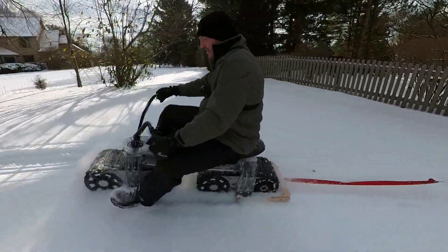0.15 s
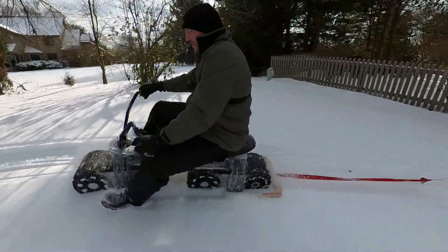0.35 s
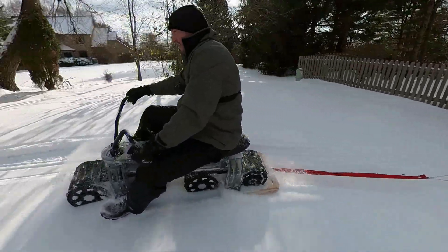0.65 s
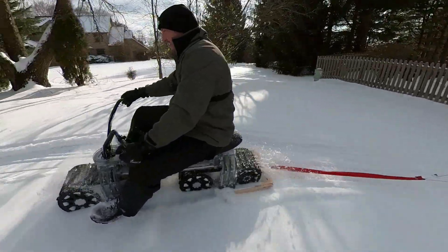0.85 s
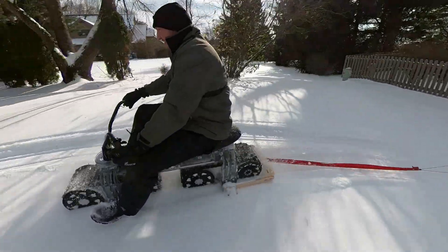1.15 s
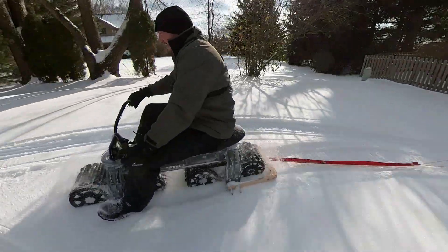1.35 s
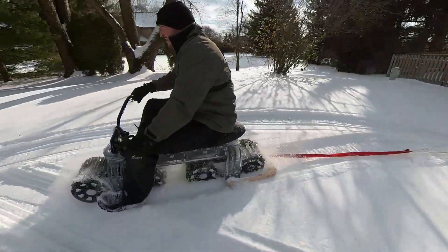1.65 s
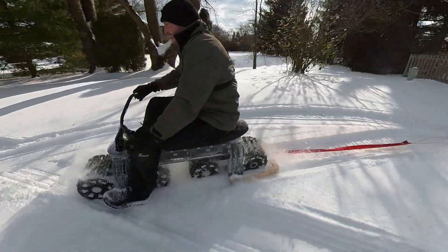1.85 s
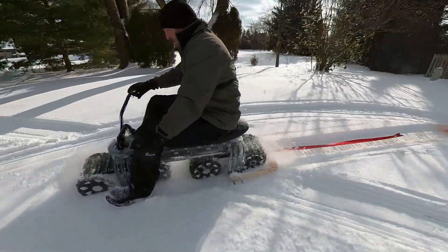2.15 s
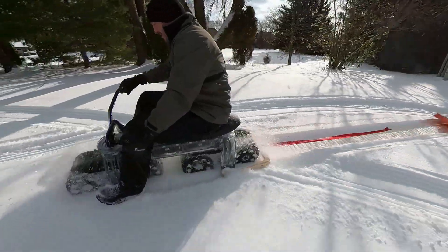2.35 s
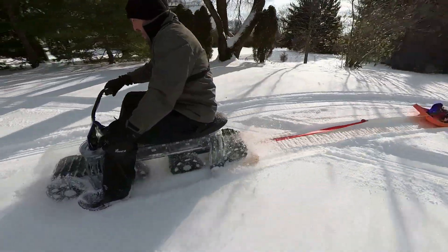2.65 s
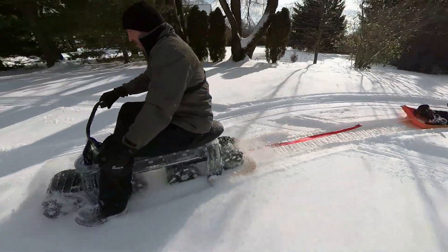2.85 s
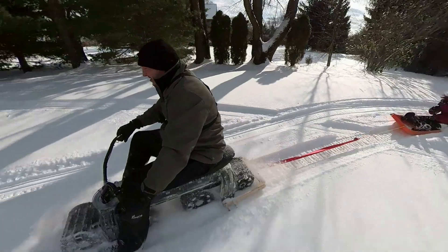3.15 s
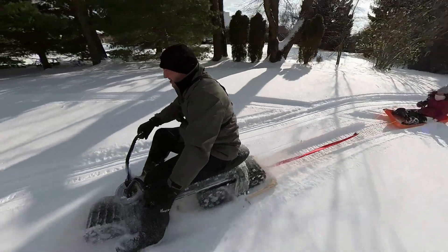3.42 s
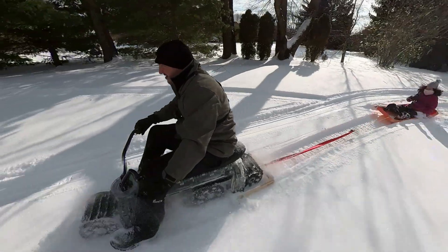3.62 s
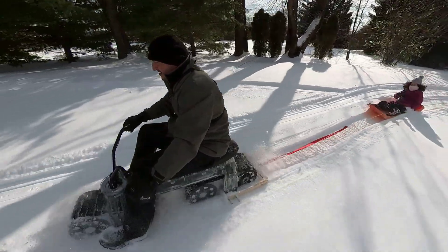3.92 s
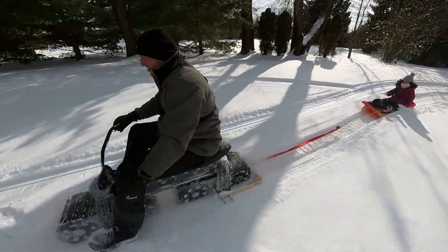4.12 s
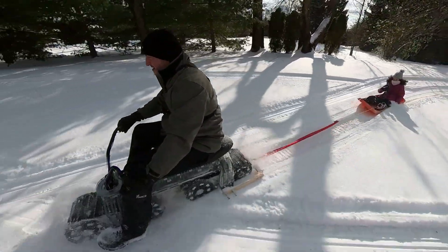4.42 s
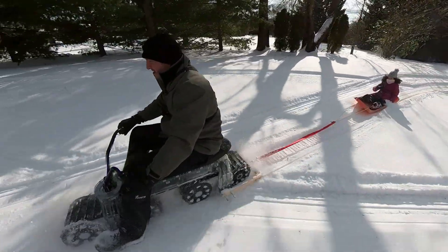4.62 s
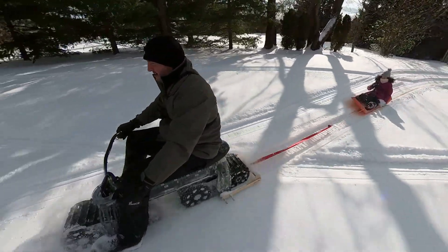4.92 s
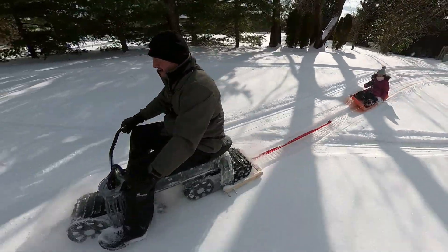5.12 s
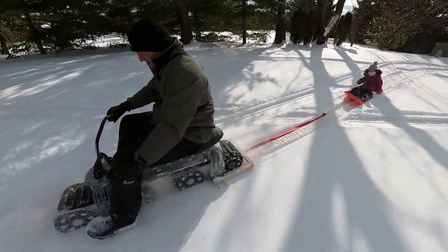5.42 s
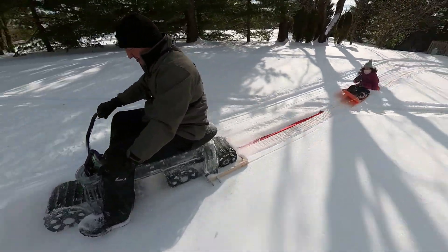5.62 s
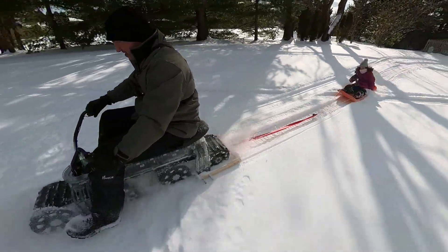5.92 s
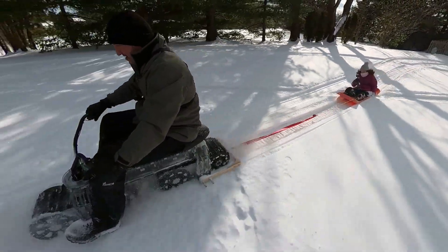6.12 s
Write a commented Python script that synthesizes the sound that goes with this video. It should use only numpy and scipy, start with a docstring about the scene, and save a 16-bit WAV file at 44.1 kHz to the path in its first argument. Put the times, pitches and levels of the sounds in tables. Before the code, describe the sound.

A rapid stuttering putter of track lugs on packed snow, close and dry, with low rumble and grainy crushing noise. It dips in pace at first, then speeds up and eases at the very end. Sprays of powder hiss early, clicks and small clusters of clatter scatter throughout, a few hard knocks jump out, and deep wind puffs buffet the stereo microphone riding alongside in the open air.

```python
"""Tracked vehicle in snow

A small electric vehicle churns along on two rubber tracks, close to a microphone that travels with it.
Lugs thump as pressure swings, about 23 to 30 a second on the near track, and tick as ringing modes.
Shaped noise makes the rumble, churn and hiss beneath, the short sprays of thrown snow and fine mist,
and the wind that buffets the two microphone ports. Hard lumps knock on the frame: rings with noise."""
import sys
import numpy as np
from scipy import signal
from scipy.fft import rfft, irfft, next_fast_len
from scipy.io import wavfile
from scipy.ndimage import uniform_filter1d, map_coordinates

SR = 44100
rng = np.random.default_rng(int(sys.argv[2]) if len(sys.argv) > 2 else 0)


def dump_mix(stems):
    """Bounce the given channels to the path in sys.argv[1] as a 16-bit WAV at rate SR."""
    frames = np.atleast_2d(stems).T  # one column per channel
    limited = np.clip(frames, -1, 1)  # hard clip at full scale
    pcm = np.round(limited * 32767).astype(np.int16)
    wavfile.write(sys.argv[1], SR, pcm)


N = 276507


def amp(db):
    """Decibels as gain."""
    return 10 ** (np.asarray(db) / 20)


def unit(x):
    """x at rms 1."""
    return x / np.sqrt(np.mean(x ** 2) + 1e-20)


def along(points, hz):
    """Read a curve of (Hz, value) points on a log frequency axis."""
    f, v = np.transpose(points)
    return np.interp(np.log(hz + 1), np.log(f + 1), v)


def curves(rows):
    """One automation curve, a value per sample, for each column after the time."""
    s, *cols = np.transpose(rows)
    return [np.interp(np.arange(N) / SR, s, c) for c in cols]


def at(curve, times):
    """Values of a per-sample curve at the given times in seconds."""
    return curve[np.clip(times * SR, 0, N - 1).astype(int)]


def wobble(rate):
    """A smooth random curve, rate knots a second."""
    knots = rng.standard_normal(int(N * rate / SR) + 4)
    return map_coordinates(knots, [np.arange(N) * rate / SR])


def filtered(x, response):
    """x times a response of frequency."""
    m = next_fast_len(N + SR // 2)
    return irfft(rfft(x, m) * response(np.fft.rfftfreq(m, 1 / SR)), m)[..., :N]


# Stereo width of the noises. Each row: frequency in Hz, left-right correlation from 0 to 1.
LIKENESS = [(35, .99), (85, .997), (170, .994), (350, .995), (550, .96), (800, .84), (1300, .62),
            (2400, .74), (4400, .84), (9000, .83), (13000, .84)]


def rush(spectrum, alike=LIKENESS):
    """Stereo noise of rms 1: mid and side are mixed to the wanted correlation at each frequency."""
    def colour(hz):
        turn = np.arccos(np.clip(along(alike, hz), -1, 1)) / 2
        return amp(along(spectrum, hz)) * [np.cos(turn), np.sin(turn)]

    mid, side = filtered(rng.standard_normal((2, N)), colour)
    return unit(np.array([mid + side, mid - side]))


def laid(times, shapes):
    """One row of samples added at each time."""
    index = np.round(np.asarray(times) * SR).astype(int)[:, None] + np.arange(shapes.shape[1])
    return np.bincount(np.clip(index, 0, N).ravel(), shapes.ravel(), N + 1)[:N]


def struck(db, modes, rise, detune_db, spread_db):
    """Decaying sine modes (Hz, dB, t60 s), with new strengths and pitches for every contact."""
    t = np.arange(SR // 30) / SR
    chance = rng.standard_normal((len(db), 2 * len(modes)))
    rings = 0
    for k, (hz, level, t60) in enumerate(modes):
        decay = amp(level + spread_db * chance[:, [2 * k]] - 60 * t / t60)
        pitch = hz * amp(detune_db * chance[:, [2 * k + 1]])
        rings = rings + decay * np.sin(2 * np.pi * pitch * t)
    return amp(db)[:, None] * (1 - np.exp(-t / rise)) * rings


def swell(times, db, rise, t60):
    """An envelope that leaps at each time and dies away."""
    t = np.arange(SR // 20) / SR
    return laid(times, amp(db[:, None] - 60 * t / t60) * (1 - np.exp(-t / rise)) ** 2)


def patchy(x, patchy_db, size):
    """x at rms 1 with random patches of gain, size = (bands, frames)."""
    z = signal.stft(x, nperseg=256)[2]
    field = rng.standard_normal(z.shape[1:])
    for axis in (0, 1):
        field = uniform_filter1d(field, size=size[axis], axis=axis)
    return unit(signal.istft(z * amp(patchy_db * unit(field)), nperseg=256)[1][:, :N])


CREST_SHARE = .66  # scales the crest of a blow relative to its dip


def thump(db, width, rebound):
    """A lug slaps packed snow: one swing of pressure, a dip and then a crest, and a small later rebound."""
    widths = width * amp(rng.normal(0, 0.58, (len(db), 1)))
    u = (np.arange(SR // 50) / SR - 1 / 100) / widths  # time from mid-swing, in widths
    swing = np.where(u > 0, CREST_SHARE, 1) * u * np.exp(.5 - u * u / 2)
    return amp(db)[:, None] * (swing + rebound * np.exp(-(u - 4.2) ** 2 / 2))


# Pace of the near track. Each row: time in seconds, lugs a second.
LUG_RATE = [(0.0, 25.0), (0.4, 23.57), (0.8, 23.26), (1.2, 23.9), (1.6, 25.62), (2.0, 25.74), (2.4, 26.45),
            (2.9, 27.23), (3.4, 28.08), (3.9, 27.8), (4.2, 27.95), (4.5, 29.11), (4.8, 28.95), (5.2, 29.07),
            (5.6, 29.51), (6.0, 29.43), (6.27, 26.63)]
# The vehicle rocks, so lugs land a little early or late. Each row: time in seconds, lead in lug pitches.
ROCKING = [(2.0, -.03), (2.3, .02), (2.72, .03), (2.88, -.07), (3.02, .04), (3.4, .03), (3.56, -.06),
           (3.7, 0), (3.85, -.08), (4.05, .03), (4.4, 0)]
FIRST_LUG = .40  # share of a lug pitch still to roll at the start
SCATTER_S = .000957  # random timing of each lug


def lug_times(lead):
    """The moments when the lugs of one track come down, and two random draws for each lug."""
    turns = np.cumsum(curves(LUG_RATE)[0]) / SR - FIRST_LUG + lead + curves(ROCKING)[0]
    times = np.flatnonzero(np.diff(np.floor(turns)) > 0) / SR
    chance = rng.standard_normal((len(times), 3))
    return times + SCATTER_S * chance[:, 0], chance[:, 1], chance[:, 2]


# Mix of the drive. Each row: time in seconds, levels in dB of rumble, churn, hiss, near blows,
# far blows and soft ticks.
DRIVE_MIX = [(0, -22, -38, -47, -12, -15, -32.5), (.7, -21.5, -35.5, -45.5, -8.5, -25, -39.5),
             (1.4, -22.5, -37.5, -47, -6.5, -30, -33.5), (1.6, -22.5, -40, -49.5, -9.5, -19, -28),
             (2, -19.5, -38.5, -48.5, -11, -21, -34.5), (2.4, -22.5, -41, -50.5, -7, -21, -29),
             (3.2, -22.5, -38, -46.5, -8.5, -14.5, -30.5), (4.1, -23, -39.5, -48, -6, -10, -32),
             (4.7, -23, -38.5, -47.5, -8.5, -15, -43), (5.4, -20.5, -38, -47.5, -21, -7, -36.5),
             (6.27, -22.5, -38, -47.5, -6.5, -18.5, -35.5)]
# The far track slips ahead in the turn. Each row: time in seconds, lead in lug pitches.
FAR_LEAD = [(0, -.3), (.3, -.05), (.6, .15), (.9, .5), (1.5, .75), (2.2, 1), (3.6, 1), (3.95, 1.25),
            (4.45, 1.5), (4.9, 1.6), (5.05, 1.75), (5.4, 1.95), (6.27, 2.05)]
# Sharp ticks on the sprockets, strong and faint, at set moments.
# Each row: time in seconds, level in dB before the modes.
SHARP_TICKS = [(0.025, -24.5), (0.055, -32), (0.0618, -24.5), (0.469, -36), (0.6395, -24), (0.6853, -26.5),
               (0.7133, -29), (0.9114, -27), (1.023, -31), (1.11, -31), (1.193, -32), (1.261, -39),
               (1.301, -32), (1.591, -27.5), (1.8223, -30), (2.368, -28), (2.405, -28), (2.419, -28),
               (2.442, -29), (2.8598, -25), (2.8966, -24.5), (2.9305, -26), (2.951, -33), (2.967, -27),
               (3.1445, -31), (3.185, -34), (3.218, -32), (3.4298, -26), (3.467, -30), (3.714, -31),
               (3.8302, -29), (3.864, -33), (3.925, -27.5), (3.9952, -23), (4.052, -27), (4.0664, -29),
               (4.0771, -30), (4.114, -32), (4.1483, -33), (4.206, -31), (4.296, -30.5), (4.331, -33),
               (4.414, -26), (4.448, -30), (4.637, -33), (4.663, -40), (4.671, -30), (4.777, -44),
               (5.0276, -26), (5.0606, -29), (5.0929, -30.5), (5.156, -37), (5.2257, -33.5), (5.2968, -28),
               (5.532, -31), (5.565, -30), (5.6, -26.5), (5.666, -33), (5.739, -42), (5.772, -27),
               (5.8032, -31), (5.8375, -25.5), (6.111, -26)]
# Modes that ring on after each blow. Each row: frequency in Hz, level in dB, t60 in seconds.
DECK_MODES = [(230, -14, 0.043), (369, -12.5, 0.032), (475, -14, 0.022), (590, -18.5, 0.019)]
# Modes of a tick. Each row: frequency in Hz, level in dB, t60 in seconds.
SPROCKET_MODES = [(600, -1, 0.017), (900, 3, 0.014), (1200, 3, 0.009), (2700, -3, 0.006), (3500, -7, 0.006),
                  (4840, -15, 0.006)]
# The sprocket's clearest ring dips, then climbs as the tracks turn toward the microphone.
# Each row: time in seconds, frequency in Hz.
CLATTER_PITCH = [(0, 2020), (1.5, 1580), (2.6, 1635), (3.1, 1959), (4.2, 2200), (6.27, 2240)]
# Tone of the rumble. Each row: frequency in Hz, relative level in dB per Hz.
RUMBLE_TONE = [(35, -29), (60, 4), (130, 5.5), (350, -1), (540, -12), (800, -25.5), (1700, -120)]
# Tone of the churned snow. Each row: frequency in Hz, relative level in dB per Hz.
CHURN_TONE = [(290, -29.5), (500, -3), (650, -1.5), (744, -4.5), (946, -4), (1130, -10), (1600, -13.5),
              (3000, -27), (3900, -55), (6600, -120)]
# Tone of the steady snow hiss. Each row: frequency in Hz, relative level in dB per Hz.
HISS_TONE = [(1300, -4.5), (2200, -3), (2700, -0.5), (3600, 1.5), (5500, -4), (7400, -9), (9200, -15),
             (11000, -19), (12300, -17.5), (14000, -30), (15700, -49)]
TICK_AHEAD_S = .0038  # a lug meets the sprocket just before it slaps the snow
SAME_LUG_S = .011  # a sharp tick belongs to the lug this near and sets its moment
SHARP_BLOW_DB = -0.5  # such a lug thumps slightly softer
BLOW_SPREAD_DB, FAR_TICK_DB = 1.9, -12.5  # random blow strength; far soft ticks against near ones
ECHO_S, ECHO_DB = .0155, -11  # the lug passes a second wheel and thumps again
CLATTER_DB, CLATTER_T60_S = 4, .01
GUST_S, GUST_DB, GUST_WIDTH_S = 5.79, 7, .025  # a gust of wind swells the low rumble once


def tracks():
    """Lugs of both tracks slap snow and ring their sprockets; their contacts swell the snow's noise."""
    rumble_db, churn_db, hiss_db, near_db, far_db, soft_db = curves(DRIVE_MIX)
    near_s, near_blow, near_echo = lug_times(lead=0)
    far_s, far_blow, far_echo = lug_times(lead=curves(FAR_LEAD)[0])
    s = np.r_[near_s, far_s]
    blow_db = np.r_[at(near_db, near_s), at(far_db, far_s)] + BLOW_SPREAD_DB * np.r_[near_blow, far_blow]

    # lugs near a sharp tick take its timing; all the others tick softly
    sharp_s, sharp_db = np.transpose(SHARP_TICKS)
    gap = np.abs(s[:, None] - TICK_AHEAD_S - sharp_s)
    soft = gap.min(1) > SAME_LUG_S
    s = np.where(soft, s, sharp_s[gap.argmin(1)] + TICK_AHEAD_S)
    blow_db = np.where(soft, blow_db, blow_db + SHARP_BLOW_DB)
    is_far = np.arange(len(s)) >= len(near_s)
    soft_tick_db = at(soft_db, s) + FAR_TICK_DB * is_far
    tick_s = np.r_[sharp_s, s[soft] - TICK_AHEAD_S]
    tick_db = np.r_[sharp_db, soft_tick_db[soft]]

    echo_s = s + ECHO_S + 2 * SCATTER_S * np.r_[near_echo, far_echo]
    slaps = thump(np.r_[blow_db, blow_db + ECHO_DB], width=0.00086, rebound=0.35)
    blows = laid(np.r_[s, echo_s] - 1 / 100, slaps)  # each slap is centred 10 ms into its row
    # a small lug radiates little deep bass
    blows = filtered(blows, lambda hz: 1j * hz / (1j * hz + 170))
    deck = laid(s + 0.0021, struck(blow_db, DECK_MODES, rise=0.0027, detune_db=1.16, spread_db=3.4))

    is_sharp = np.arange(len(tick_s)) < len(sharp_s)
    rise = np.where(is_sharp, .00045, .001)[:, None]  # soft ticks are duller
    clatter = (at(curves(CLATTER_PITCH)[0], tick_s)[:, None], CLATTER_DB, CLATTER_T60_S)
    rings = struck(tick_db, [*SPROCKET_MODES, clatter], rise=rise, detune_db=0.76, spread_db=2.5)
    ticks = laid(tick_s, rings)

    # the frame shudders on after a blow, and each contact crushes a little snow
    shudder = swell(s - .004, blow_db + 17.5, rise=0.00038, t60=0.029)
    crush = swell(tick_s, tick_db + 30.5, rise=0.00051, t60=0.034)
    gust_db = GUST_DB * np.exp(-((np.arange(N) / SR - GUST_S) / GUST_WIDTH_S) ** 2)
    rumble_gain = amp(rumble_db + gust_db + 1.7 * wobble(25)) * unit(1 + 0.32 * shudder)
    churn_gain = amp(churn_db + 1.43 * wobble(60)) * unit(1 + 0.37 * shudder + 1.9 * crush)
    hiss_gain = amp(hiss_db + 0.85 * wobble(50)) * unit(1 + 0.19 * crush)
    rumble = rumble_gain * rush(RUMBLE_TONE)
    churn = churn_gain * rush(CHURN_TONE)
    hiss = hiss_gain * patchy(rush(HISS_TONE), patchy_db=3.0, size=(9, 4))
    return blows + deck + ticks + rumble + churn + hiss


# Bursts of thrown snow. Each row: start in seconds, length in ms, level in dB.
SPRAY_BURSTS = [(0.0, 40, -36.5), (0.237, 20, -37), (0.28, 4, -43), (0.292, 8.1, -40), (0.322, 8.2, -41.5),
                (0.363, 41, -34.5), (0.849, 2.7, -42), (0.88, 41, -29.5), (0.922, 34, -40),
                (0.948, 22, -35), (1.022, 7.9, -47), (1.032, 15.3, -32.5), (1.054, 19, -32.5),
                (1.071, 12, -32.5), (1.082, 15, -35.5), (1.127, 2.5, -32), (1.163, 4.4, -36),
                (1.225, 25, -38), (1.271, 23, -35), (1.303, 4, -39), (1.315, 21, -35.5), (1.81, 5.6, -40.5),
                (1.901, 4, -39), (1.921, 5.3, -34.5), (1.93, 13, -37.5), (1.946, 4, -39), (1.954, 21, -35),
                (1.998, 2.6, -40), (2.046, 5.2, -34.5), (2.085, 36, -35.5), (2.127, 14, -36.5),
                (2.185, 2.8, -32.5), (2.199, 6.4, -36), (2.215, 3.2, -38), (2.786, 3, -43),
                (2.9522, 3, -42), (3.134, 3.2, -38.5), (3.152, 10, -44), (3.194, 3, -48),
                (3.2231, 3.7, -44), (3.2404, 5.1, -42.5), (3.38, 9.5, -38.5), (3.7068, 3, -38.5),
                (3.789, 3.4, -44), (4.266, 2.3, -35.5), (4.643, 3.5, -46), (4.7358, 2.8, -42),
                (5.1702, 2.6, -38), (5.2914, 4.4, -43), (5.77, 4.7, -43)]
# Tone of sprays and mist. Each row: frequency in Hz, relative level in dB per Hz.
POWDER_TONE = [(1500, -3), (2600, -5.5), (3700, -1.5), (4400, 0.5), (5400, -1.5), (6300, -5.5), (7300, -3),
               (8400, -7), (9900, -13), (11200, -15.5), (12400, -15), (13600, -26), (15500, -32),
               (17000, -120)]
# Fine snow in the air. Each row: time in seconds, level in dB.
MIST_LEVEL = [(0, -57), (1.1, -52), (1.2, -45.5), (1.49, -39), (1.505, -54.5), (6.27, -70)]


def sprays():
    """Dense snow grains as gated, patchy noise that starts sharply and stops, over a fine mist."""
    s, ms, db = np.transpose(SPRAY_BURSTS)[:, :, None]
    t = np.arange(SR // 12) / SR
    start = np.clip(t / 0.001, 0, 1)
    stop = np.clip((ms / 1000 - t) / 0.0038 + 0.5, 0, 1)
    fade = amp(-3 * t / 0.025 + 4.2 * np.exp(-t / 0.0029))  # a brief louder start, then a slow fall
    bursts = laid(s[:, 0], start * stop * fade * amp(db))
    grain_gain = amp(0.79 * wobble(240) + 2.6 * wobble(900))
    grains = patchy(rush(POWDER_TONE), patchy_db=3.0, size=(3, 14)) * grain_gain
    mist = amp(curves(MIST_LEVEL)[0]) * patchy(rush(POWDER_TONE), patchy_db=1.0, size=(6, 8))
    return bursts * grains + mist


# Level of the steady buffeting. Each row: time in seconds, level in dB.
WIND_LEVEL = [(0, -31), (.5, -38), (.9, -26.5), (1.4, -31), (1.7, -30), (2.3, -25.5), (2.8, -31),
              (3.6, -29.5), (4.3, -31.5), (4.8, -33), (5.3, -27), (5.8, -26.5), (6.27, -34)]
# The wind's low tone. Each row: frequency in Hz, relative level in dB per Hz.
BUFFET_TONE = [(8, -25), (22, -1), (45, -1), (70, -8), (140, -30), (400, -120)]
# Puffs on the ports. Each row: centre in seconds, width in seconds, deep level in dB, upper level in dB.
PUFFS = [(.73, 0.09, -28, -43), (1.02, 0.046, -20, -39), (1.2, 0.048, -19.5, -29.5), (1.4, 0.058, -20, -30),
         (1.62, .08, -36, -51), (1.75, 0.1, -31, -41), (2.05, 0.027, -25, -42), (2.19, 0.047, -30, -29.5),
         (2.33, 0.046, -21, -36), (2.5, 0.12, -33, -37), (2.68, 0.04, -20.5, -40), (3.25, .1, -40, -63),
         (3.66, 0.067, -20, -30), (4.01, 0.084, -27, -47), (4.35, 0.082, -34, -56), (4.88, 0.069, -29, -37),
         (5.65, 0.062, -38, -55), (5.79, 0.039, -35, -27), (5.95, 0.088, -37, -51)]
# Upper part of a puff. Each row: frequency in Hz, relative level in dB per Hz.
FLUTTER_TONE = [(40, -30), (75, 0), (170, -5), (350, -14), (600, -25), (1200, -120)]


def wind():
    """Lumpy low buffeting shared by the ports, and puffs whose turbulence differs from port to port."""
    s, width, deep_db, upper_db = np.transpose(PUFFS)[:, :, None]
    bell = np.exp(-((np.arange(N) / SR - s) / width) ** 2)
    apart = [(100, 0)]  # no left-right likeness at any pitch
    deep = (amp(deep_db) * bell).sum(0) * rush(BUFFET_TONE, apart)
    upper = (amp(upper_db) * bell).sum(0) * rush(FLUTTER_TONE, apart)
    puffs = (deep + upper) * amp([[-3], [2.5]])  # left, right
    lumps_db = 1.6 * wobble(9)
    return amp(curves(WIND_LEVEL)[0] + lumps_db) * rush(BUFFET_TONE) + puffs


# Lumps on the frame. Each row: time in seconds, crack level in dB, then the level in dB of each frame mode.
LUMP_HITS = [(0.383, -46, -34, -15.5, -28, -44), (1.847, -19, -11.5, -13, -38, -38),
             (1.864, -23.5, -18, -18, -33, -38), (1.882, -51, -23, -30, -36, -46),
             (1.895, -46, -22, -20, -35, -34), (1.941, -50, -14.5, -28, -40, -27),
             (2.067, -23, -18, -24, -28, -34), (2.073, -22, -12.5, -13.5, -14, -19),
             (2.777, -48, -22, -26, -32, -40), (3.4315, -27, -14, -17, -10, -30),
             (3.472, -20, -28, -37, -42, -44), (3.493, -25, -38, -34, -28, -38),
             (3.499, -22, -20, -15, -10, -28), (3.5435, -34, -17, -17, -19, -28),
             (4.939, -33, -17, -14, -30, -18), ]
# Frame modes rung by the lumps. Each row: frequency in Hz, t60 in seconds.
FRAME_MODES = [(900, 0.02), (1110, 0.016), (1330, 0.018), (1820, 0.016)]
# Noise body of a knock. Each row: frequency in Hz, relative level in dB per Hz.
BODY_TONE = [(400, -47), (900, 3), (1300, 6), (1800, -28), (3000, -5), (8000, -87)]
# Bright crack of a knock. Each row: frequency in Hz, relative level in dB per Hz.
CRACK_TONE = [(1500, -12), (2800, -3), (4300, 1), (5600, -4), (7500, -13), (13000, -34), (16000, -90)]
BODY_DB = -2.5  # the body noise against the knock's strongest mode
RATTLE_S, RATTLE_DB, RATTLE_CRACK_DB = .007, -11, -20  # a knocked part bounces once more, dully


def knocks():
    """Hard lumps strike the frame and bounce: a short ring in a body of noise, and a brighter crack."""
    first = np.array(LUMP_HITS)
    bounce_s = first[:, 0] + RATTLE_S * amp(rng.normal(0, 2, len(first)))
    bounce = np.c_[bounce_s, first[:, 1] + RATTLE_CRACK_DB, first[:, 2:] + RATTLE_DB]
    s, crack_db, *mode_db = np.r_[first, bounce].T
    ring = 0
    for db, (hz, t60) in zip(mode_db, FRAME_MODES):
        ring = ring + laid(s, struck(db, [(hz, 0, t60)], rise=0.0009, detune_db=0.12, spread_db=.4))
    body = swell(s, np.max(mode_db, 0) + BODY_DB, rise=0.00049, t60=0.014) * rush(BODY_TONE)
    crack = swell(s, crack_db, rise=0.00055, t60=0.026) * rush(CRACK_TONE)
    return ring + body + crack


def scene():
    """All sources at the microphone."""
    return tracks() + sprays() + wind() + knocks()


# Differences between the ports. Each row: frequency in Hz, left lead in radians, left over right in dB.
PORT_OFFSETS = [(200, .02, -.2), (400, -.05, -.2), (700, -.08, -.4), (950, -.45, -1.6), (1300, -.12, -1.3),
                (2100, -.55, -1.8), (3500, -.5, -1.1), (5000, -.35, -.3), (7000, -.05, 0), (9500, 0, 0),
                (13000, 0, 1.5)]
TOP_HZ = 15780  # upper band limit


def record(dry):
    """The two ports differ a little in phase and level, the loudest crests round off, the band is limited."""
    hz_points, lead, balance_db = np.transpose(PORT_OFFSETS)
    half = np.array([[.5], [-.5]])  # each port takes half the difference

    def port(hz):
        phase = half * along(np.c_[hz_points, lead], hz)
        level_db = half * along(np.c_[hz_points, balance_db], hz)
        return np.exp(1j * phase) * amp(level_db)

    wet = filtered(dry, port)
    wet = wet / (1 + np.abs(wet / .67) ** 4) ** (1 / 4)
    return filtered(wet, lambda hz: hz < TOP_HZ)


dry = scene()
out = record(dry)
dump_mix(out)
```